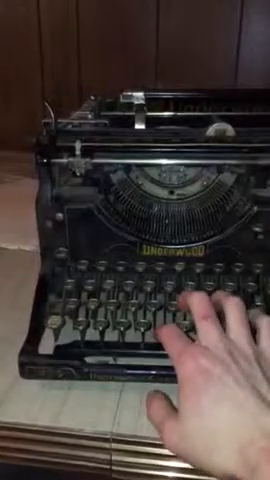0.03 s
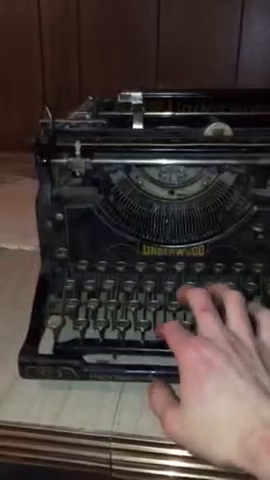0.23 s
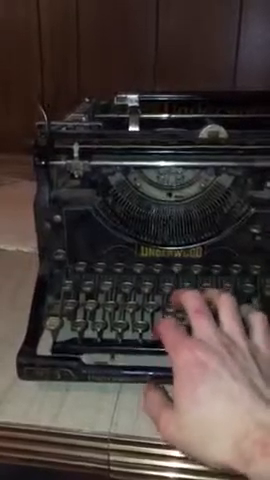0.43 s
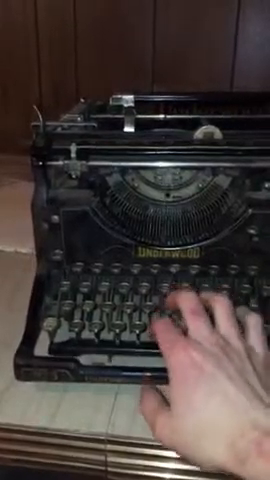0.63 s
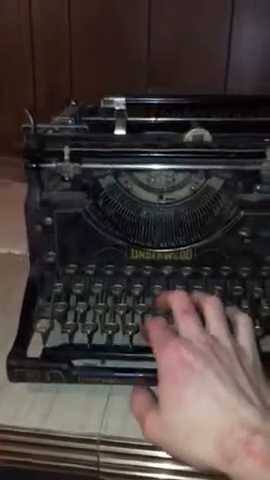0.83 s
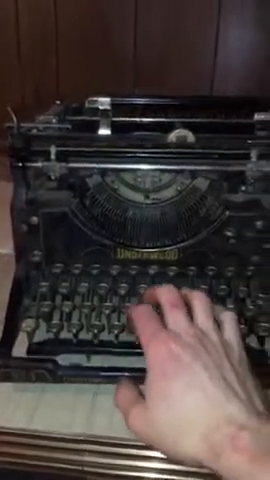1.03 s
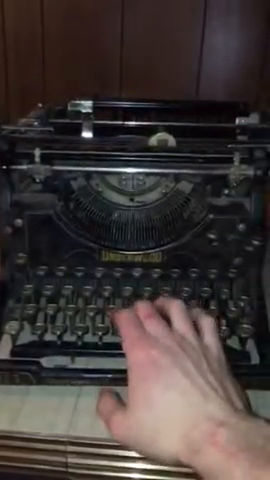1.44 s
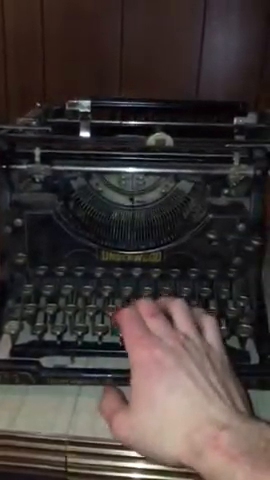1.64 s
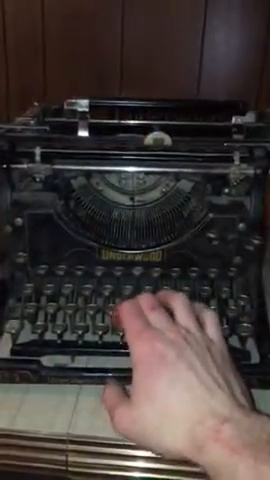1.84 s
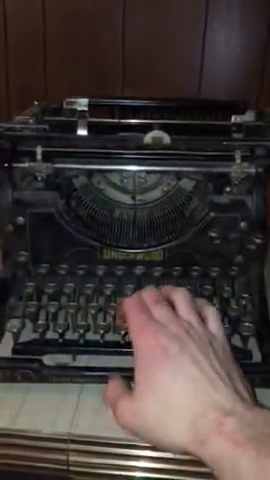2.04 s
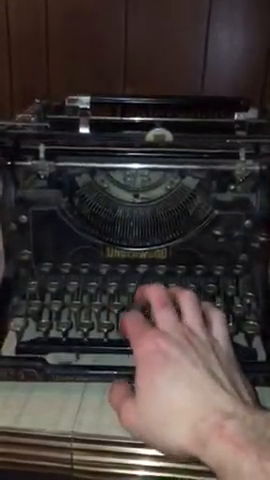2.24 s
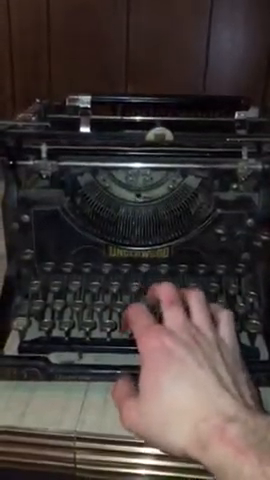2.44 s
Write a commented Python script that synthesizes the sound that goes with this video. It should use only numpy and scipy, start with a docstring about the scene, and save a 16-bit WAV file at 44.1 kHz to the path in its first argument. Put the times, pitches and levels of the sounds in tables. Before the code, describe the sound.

Close up, an old typewriter's levers click softly, then nine keys clack one after another with a short room echo. Light rattles and faint, thin squeaks fill the gaps, and a soft knock ends the typing over a low rumble.

```python
"""An old manual typewriter stands close by on a desk, in a small panelled room with a low rumble.
First, levers click and rattle, keys knock on their rest, small parts ring and a thin, high squeak sounds.
Then nine keys are struck. Each push shakes the desk and trips the escapement (the catch that steps the
carriage); the type bar slaps the platen (the roller), the iron frame rings and the desk thumps.
Clicks and a few squeaks fill the gaps. A spring hums just before the last stroke; a knock ends the typing."""
import sys
import numpy as np
from scipy import signal
from scipy.fft import rfft, irfft
from scipy.io import wavfile
from scipy.ndimage import uniform_filter1d

SR = 44100
rng = np.random.default_rng(int(sys.argv[2]) if len(sys.argv) > 2 else 0)


def int16_out(signal):
    """Quantize to a 16-bit WAV file."""
    q = np.round(np.clip(np.atleast_2d(signal).T, -1, 1) * 32767)
    wavfile.write(sys.argv[1], SR, q.astype(np.int16))


N = 114660
RING_TIME = np.arange(SR // 2) / SR  # half a second for a part to ring


def amp(db):
    """Turns decibels into a gain."""
    return 10 ** (np.asarray(db) / 20)


def read(points, hz):
    """Looks up a table's value at hz, sliding between rows on a log-frequency axis."""
    row_hz, value = np.transpose(points)
    return np.interp(np.log(hz + 1), np.log(row_hz), value)


def unit(x):
    """Scales a sound to energy 1."""
    return x / np.sqrt(np.sum(x ** 2) + 1e-20)


def add(mix, start, sound):
    """Mixes a sound in at a start time in seconds."""
    part = mix[max(round(start * SR), 0):][:len(sound)]
    part += sound[:len(part)]


def fade(t, t60):
    """Dies away by 60 dB in t60 seconds, the fade time."""
    return np.exp(-np.log(1000) * t / t60)


def rise(t, rise_s):
    """Climbs smoothly from 0 towards 1."""
    return 1 - np.exp(-t / rise_s)


def high_pass(hz, order):
    """A filter that cuts what lies below hz."""
    return signal.butter(order, hz, "high", fs=SR, output="sos")


def noise(colour, size):
    """Noise of average power 1, shaped by a table of frequencies and levels."""
    gain = amp(read(colour, np.fft.rfftfreq(size, 1 / SR)))
    return unit(irfft(rfft(rng.standard_normal(size)) * gain, size)) * np.sqrt(size)


def burst(colour, t60, rise_s, size=8192):
    """Many small parts ringing at once make a short puff of noise, here of energy 1."""
    t = np.arange(size) / SR
    return unit(noise(colour, size) * rise(t, rise_s) * fade(t, t60))


def ring(tones, detune, uneven_db, scatter):
    """A struck part's fading tones; chance shifts pitch (detune), level (uneven_db) and phase (scatter)."""
    out = np.zeros(len(RING_TIME))
    for hz, db, t60 in tones:
        level, pitch, phase = rng.standard_normal(3)
        cycles = hz * (1 + detune * pitch) * RING_TIME + scatter * phase
        out += amp(db + uneven_db * level) * fade(RING_TIME, t60) * np.sin(2 * np.pi * cycles)
    return out


def note(hz, t60, rise_s):
    """One pure tone that swells and fades."""
    return rise(RING_TIME, rise_s) * fade(RING_TIME, t60) * np.sin(2 * np.pi * hz * RING_TIME)


# The background. Each row: frequency in Hz, relative level in dB.
RUMBLE_COLOUR = [(20, -43), (40, -32), (62, -5), (95, -1.5), (150, 0.5), (250, -11.5), (330, -10),
                 (500, -26.5), (1000, -25), (3000, -32.5), (8000, -44.5), (17000, -58)]
def rumble():
    """A low, steady rumble fills the room."""
    return amp(-40.5) * noise(RUMBLE_COLOUR, N)


# The tone of the echo. Each row: frequency in Hz, relative level in dB.
ECHO_COLOUR = [(100, -3), (300, 3.5), (500, 5), (850, -2), (1500, 0), (2400, 2.5), (3500, 1.5), (5000, 0),
               (6300, 3), (7500, -6), (9300, -2), (11000, -7), (17000, -11.5)]
# How long the echo lasts. Each row: frequency in Hz, fade time in seconds.
ECHO_FADES = [(200, 0.27), (700, 0.37), (2000, 0.57), (4500, 0.58), (8000, 0.36), (16000, 0.27)]
def room_echo():
    """The walls throw back scattered reflections, each band dying at its own speed."""
    reflections = rng.standard_normal(SR) * (rng.random(SR) < .25)
    hz, t, bands = signal.stft(reflections, SR, nperseg=256)
    bands = bands * fade(t, read(ECHO_FADES, hz)[:, None])
    tail = unit(signal.istft(bands, SR, nperseg=256)[1][:SR])
    colour = amp(read(ECHO_COLOUR, np.fft.rfftfreq(2 * SR, 1 / SR)))
    tail = irfft(rfft(tail, 2 * SR) * colour)[:SR]
    delay = np.zeros(round(.008 * SR))
    return amp(-3.5) * np.concatenate([delay, tail])


def with_echo(sound, room, echo_db):
    """A sound together with its echo from the walls."""
    return sound + amp(echo_db) * signal.fftconvolve(sound, room)[:N]


# One tick of the rattle. Each row: frequency in Hz, relative level in dB.
RATTLE_COLOUR = [(150, 0.5), (500, 11), (800, 4), (2000, -1.5), (4500, -19), (7300, -5), (9000, -8.5),
                 (17000, -12.5)]
def rattle(ticks_per_s=160, end_s=2.44):
    """Loose parts tick faintly at random while the hand moves."""
    out = np.zeros(N)
    starts = np.cumsum(rng.exponential(1 / ticks_per_s, 600))
    for start in starts[starts < end_s]:
        db = -30 + 4.5 * min(rng.standard_normal(), 2)
        add(out, start, amp(db) * burst(RATTLE_COLOUR, t60=.019, rise_s=.0006, size=1024))
    return out


# The desk's tones, lowest first. Each row: pitch in Hz, relative level in dB, fade time in seconds.
DESK_TONES = [(111, -7.5, 0.37), (158.8, 2.5, 0.38), (202, -1, 0.12), (225.3, -8.5, 0.46),
              (323.7, -3, 0.35), (411.3, -5, 0.23), (475, -12, 0.19), (506.6, -5.5, 0.31)]
def desk(detune, uneven_db, rows=slice(None)):
    """The shaken desk swells and booms with the chosen rows of its tones."""
    return rise(RING_TIME, .0079) * ring(DESK_TONES[rows], detune, uneven_db, scatter=1)


# The dull body of a knock. Each row: frequency in Hz, relative level in dB.
THUD_COLOUR = [(100, -6), (300, -1.5), (650, 1), (5000, -55)]
# Keys falling back. Each row: start in seconds, relative level in dB.
KEY_KNOCKS = [(.004, -0.5), (.133, -3), (0.899, -4), (1.15, 0), (2.219, -2.5), (2.435, 2)]
def key_knocks():
    """A key drops on its rest with a thud and shakes the desk's upper tones."""
    out = np.zeros(N)
    for start, db in KEY_KNOCKS:
        add(out, start, amp(db - 11.5) * burst(THUD_COLOUR, t60=.27, rise_s=.0039))
        add(out, start, amp(db - 36.5) * desk(detune=.025, uneven_db=3, rows=slice(3, None)))
    return out


# One lever click. Each row: frequency in Hz, relative level in dB.
LEVER_COLOUR = [(150, -4), (500, 4), (800, -7), (1300, 3.5), (2400, -.5), (4200, -4.5), (7300, -6),
                (9000, -8), (10500, -10), (17000, -13)]
# A spring's ping. Each row: pitch in Hz, relative level in dB, fade time in seconds.
PING_TONES = [(8350, -11, 0.013), (8700, -4, 0.027), (9050, 7, 0.0079)]
# The clicks. Each row: start in seconds, relative level in dB, brightness in dB per octave,
# relative level of the ping in dB.
LEVER_CLICKS = [(.0044, -6, 0, -12.5), (0.0252, -16, 2, -9), (0.0357, -15, -2.5, -12.5),
                (0.1215, -5, 3.5, -13), (0.1436, -6, 2.5, -22), (0.2063, -8, 1, -23), (0.258, -11, 2.5, -4),
                (0.273, -6.5, 1, -21), (0.4253, -7, 0, -12), (0.6737, -8, -0.5, -5),
                (0.7064, -3.5, -0.5, -16), (0.8788, -8.5, 4, -3.5), (0.8865, -3.5, 3, -12.5),
                (0.9018, -2.5, 2, -10), (0.915, -9, -3.5, -17.5), (1.1434, -3, 0.5, -11),
                (2.2081, -3, 1, -13), (2.4279, -3.5, -1, -27.5)]
def lever_clicks():
    """Keys and bars click as they fall back, and a spring pings with each."""
    out = np.zeros(N)
    for start, db, brightness, ping_db in LEVER_CLICKS:
        colour = [(hz, level + brightness * np.log2(hz)) for hz, level in LEVER_COLOUR]
        add(out, start, amp(db - 3.5) * burst(colour, t60=.063, rise_s=.00041))
        ping = unit(ring(PING_TONES, detune=.0071, uneven_db=.5, scatter=.64))
        add(out, start, amp(ping_db - 9) * ping)
    return out


# Small ringing parts. Each row: start in seconds, pitch in Hz, level in dB, fade time in seconds.
TINK_NOTES = [(.127, 1155, -36, 0.067), (.133, 1680, -41, 0.087), (.263, 1186, -40, .09),
              (0.773, 1144, -30.5, .11), (1.1435, 2190, -32, 0.029), (1.266, 546, -30.5, 0.11),
              (2.21, 4060, -35.5, .06), (2.219, 1124, -35, .06), (2.272, 1131, -29, 0.075)]
def tinks():
    """Single levers and carriage parts ring briefly, each at its own pitch."""
    out = np.zeros(N)
    for start, hz, db, t60 in TINK_NOTES:
        add(out, start, amp(db) * note(hz, t60, rise_s=.001))
    return out


# The squeaks. Each row: start in seconds, pitch in Hz, level in dB.
THIN_SQUEAKS = [(.218, 16040, -24), (.443, 16140, -26), (1.102, 16750, -24), (1.342, 16700, -25)]
def squeaks(rise_s=.0036, waver_hz=130):
    """A few levers give a brief, wavering whistle at the top of hearing."""
    out, t = np.zeros(N), np.arange(4096) / SR
    swell = t / rise_s * np.exp(1 - t / rise_s)
    for start, hz, db in THIN_SQUEAKS:
        waver = uniform_filter1d(rng.standard_normal(len(t)), 100) * 10  # smooth, about 1 in size
        cycles = np.cumsum(hz + waver_hz * waver) / SR
        add(out, start, amp(db) * swell * np.sin(2 * np.pi * cycles))
    return out


def finger_push():
    """The soft push on a key shakes only the desk's three lowest tones."""
    return desk(detune=.0097, uneven_db=0, rows=slice(3))


# The escapement's tick. Each row: frequency in Hz, relative level in dB.
ESCAPEMENT_COLOUR = [(200, 8.5), (1000, -5), (3000, 1.5), (6000, 2), (9000, 0), (17000, -2.5)]
def escapement():
    """The catch that steps the carriage trips with a sharp tick."""
    return amp(-7.5) * burst(ESCAPEMENT_COLOUR, t60=.017, rise_s=.00022)


# Type hitting the roller. Each row: pitch in Hz, relative level in dB, fade time in seconds.
PLATEN_TONES = [(986, -14, 0.0023), (1218, -4, 0.0087), (1620, -10, 0.0039), (1692, -4.5, 0.0077),
                (2298, -4, 0.0047), (2490, -4.5, 0.0073), (3475, -2, 0.0081), (3713, -4, 0.0082),
                (4230, -5.5, 0.0046), (5800, -2.5, 0.0063), (6630, -1.5, 0.0064), (8030, -3.5, 0.0068),
                (9360, -1, 0.0024), (11150, -8.5, 0.0039), (12950, -9, .002), (14500, -4.5, .002)]
def platen_crack(rise_s, contact_s=.0011):
    """The metal letter presses on the roller; the tones hold for that moment, then die fast."""
    t = np.arange(2048) / SR
    since_contact = np.maximum(t - contact_s, 0)
    crack = np.zeros(len(t))
    for hz, db, t60 in PLATEN_TONES:
        level, pitch = rng.standard_normal(2)
        tone = np.sin(2 * np.pi * hz * (1 + .008 * pitch) * t)
        crack += amp(db + .7 * level) * fade(since_contact, t60) * tone
    # small parts give off little bass
    return amp(-9) * signal.sosfilt(high_pass(924, order=4), crack * rise(t, rise_s))


# The iron frame and its springs. Each row: pitch in Hz, relative level in dB, fade time in seconds.
FRAME_TONES = [(1242, -5.5, 0.14), (1635, 0.5, .12), (1736, 5, 0.142), (1980, -2, 0.13), (1990, 1.5, 0.15),
               (2450, -8, 0.35), (2690, -14, .35), (2470, -7.5, 0.62), (3220, -2, 0.14), (3630, -4.5, 0.21),
               (3850, -4, 0.33), (4450, -4, 0.29), (6100, -9, .12)]
# The snap of metal on paper. Each row: frequency in Hz, relative level in dB.
SNAP_COLOUR = [(750, -18.5), (1020, 4), (2500, 2.5), (3000, -8), (3600, 2.5), (6300, 2.5), (17000, -10)]
# Bar and carriage bouncing back. Each row: usual delay in seconds, relative level in dB.
BOUNCES = [(.0052, -1.5), (.0092, -0.5)]
def type_bar(rise_s=.00008, jitter_s=.0008):
    """The bar snaps on the paper and roller, bounces back and leaves the frame ringing."""
    out = amp(-36) * ring(FRAME_TONES, detune=.00085, uneven_db=3.5, scatter=.8)
    add(out, 0, platen_crack(rise_s))
    add(out, 0, amp(4.5) * burst(SNAP_COLOUR, t60=.007, rise_s=rise_s))
    for delay, db in BOUNCES:
        start = delay + jitter_s * rng.standard_normal()
        add(out, start, amp(db) * burst(SNAP_COLOUR, t60=.014, rise_s=rise_s))
    return out


# The clatter of a blow. Each row: frequency in Hz, relative level in dB.
CLATTER_COLOUR = [(100, -35), (500, 1), (800, -10.5), (1200, 2.5), (3000, 2), (6000, 4.5), (7500, -2),
                  (9300, 0), (11000, -5), (17000, -8.5)]
def clatter():
    """The blow shakes all the loose parts at once."""
    return amp(5.5) * burst(CLATTER_COLOUR, t60=.041, rise_s=.0013)


def partly_same(shared, fresh, shared_energy=.55):
    """Blends what all blows have in common with what is new each time."""
    return np.sqrt(shared_energy) * shared + np.sqrt(1 - shared_energy) * fresh


# The nine strokes. Each row: time of the blow in seconds, relative levels in dB of the blow, the desk
# thump and the finger push, then how many seconds early the escapement ticks.
KEYSTROKES = [(0.3446, -1, -26, -23, 0.0053), (0.5591, -1, 4.5, -1.5, 0.0057), (0.771, -3, 1.5, 2, 0.0058),
              (0.9867, -4.5, -2, 7, 0.0067), (1.2607, -1, -2, -4.5, 0.0046), (1.5246, -2, -9.5, -10, 0.005),
              (1.7736, -2.5, -11, -11, 0.0046), (2.0188, -1.5, -3.5, -18, 0.005),
              (2.2704, -1.9, -5.5, 3, 0.005)]
def keystrokes(room, push_early_s=.0342, desk_db=-34.5):
    """The finger pushes, the escapement ticks, then the blow lands with a clatter, a thump and an echo."""
    out, shared_clatter = np.zeros(N), clatter()
    for hit, blow_db, thump_db, push_db, tick_early_s in KEYSTROKES:
        add(out, hit - push_early_s, amp(desk_db + push_db) * finger_push())
        add(out, hit - tick_early_s, escapement())
        add(out, hit, amp(blow_db) * type_bar())
        add(out, hit, amp(blow_db) * partly_same(shared_clatter, clatter()))
        add(out, hit, amp(desk_db + thump_db) * desk(detune=.017, uneven_db=3))
        add(out, hit, amp(blow_db + 11.5) * partly_same(room, room_echo()))
    return out


# The humming spring. One row: start in seconds, pitch in Hz, level in dB, fade time in seconds.
SPRING_HUM = (2.16, 2065, -42, .5)
def humming_spring():
    """A spring is left humming with one faint metallic tone."""
    start, hz, db, t60 = SPRING_HUM
    out = np.zeros(N)
    add(out, start, amp(db) * note(hz, t60, rise_s=.013))
    return out


def scene():
    """The typewriter over the low rumble of the room."""
    room = room_echo()
    out = rumble() + key_knocks()
    out += with_echo(rattle() + lever_clicks() + tinks(), room, echo_db=-5)
    out += with_echo(squeaks(), room, echo_db=3)
    out += keystrokes(room) + humming_spring()
    return out[None]


def suppress_hiss(x, above_hz=600, threshold_db=-45.5):
    """A noise suppressor turns the treble down further once it falls below a threshold."""
    treble = signal.sosfiltfilt(high_pass(above_hz, order=2), x)
    level_db = 10 * np.log10(abs(uniform_filter1d(treble ** 2, size=1500)) + 1e-12)
    cut_db = .94 * np.minimum(level_db - threshold_db, 0)
    return x + treble * (amp(cut_db) - 1)


def record(dry):
    """Hiss is turned down; the microphone rounds off loud peaks; the deepest bass and very top are cut."""
    rounded = np.tanh(suppress_hiss(dry))
    bass_cut = signal.sosfilt(high_pass(46.6, order=2), rounded)
    top_cut = signal.firwin(201, 17600, window=("kaiser", 9), fs=SR)
    return signal.oaconvolve(bass_cut, top_cut[None], "same")


dry = scene()
out = record(dry)
int16_out(out)
```